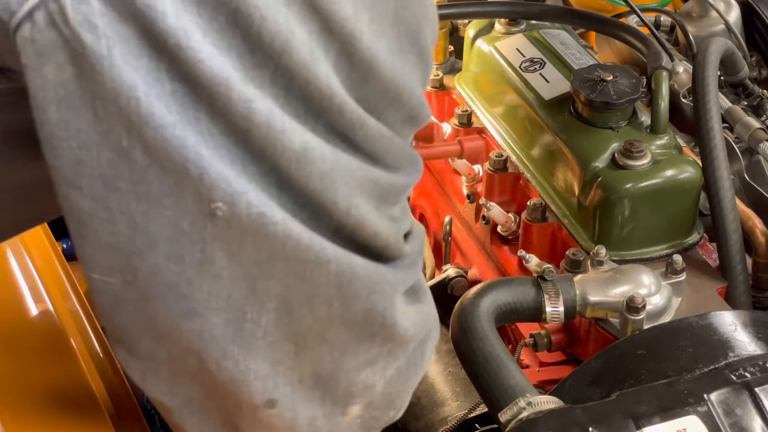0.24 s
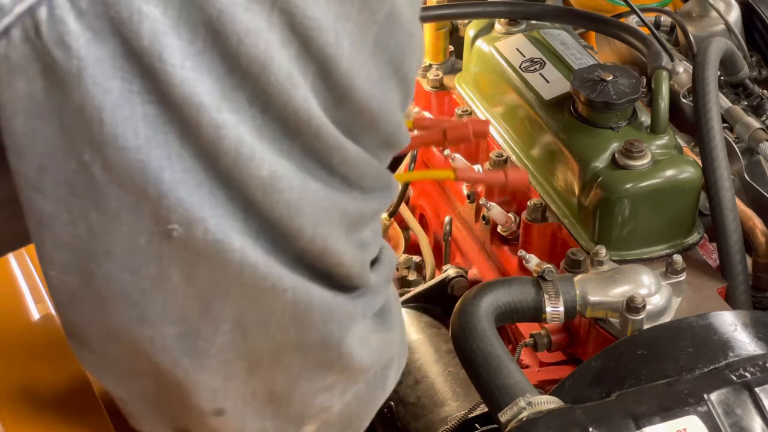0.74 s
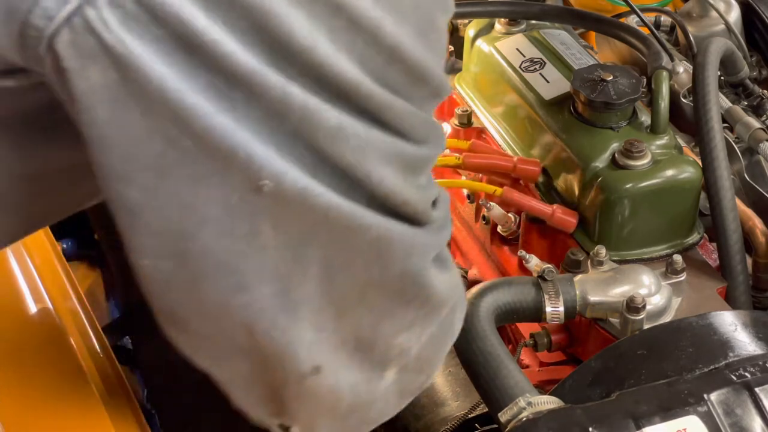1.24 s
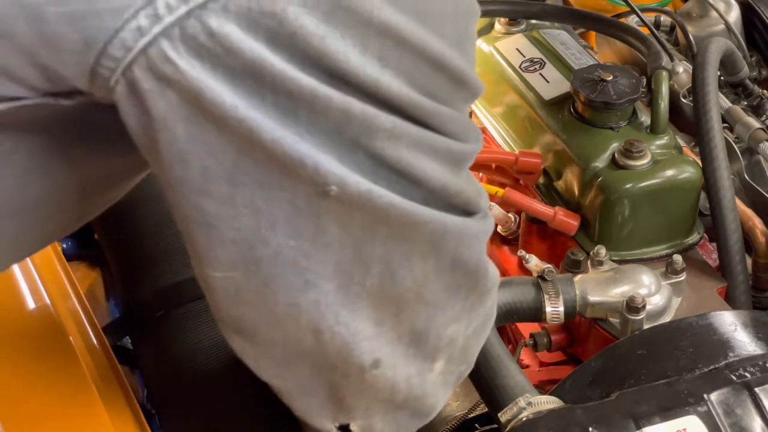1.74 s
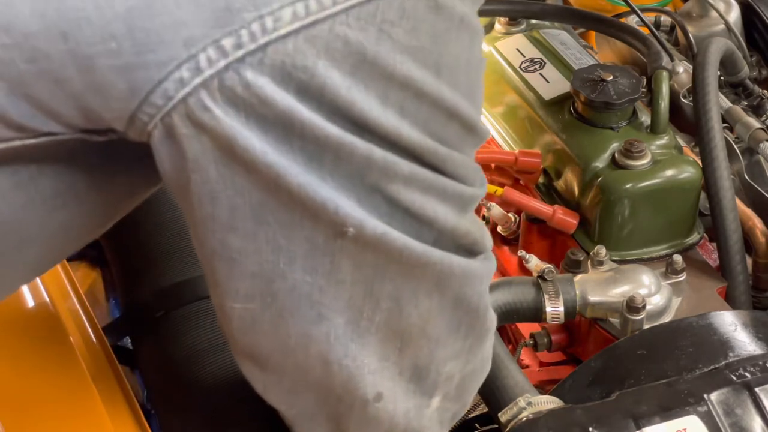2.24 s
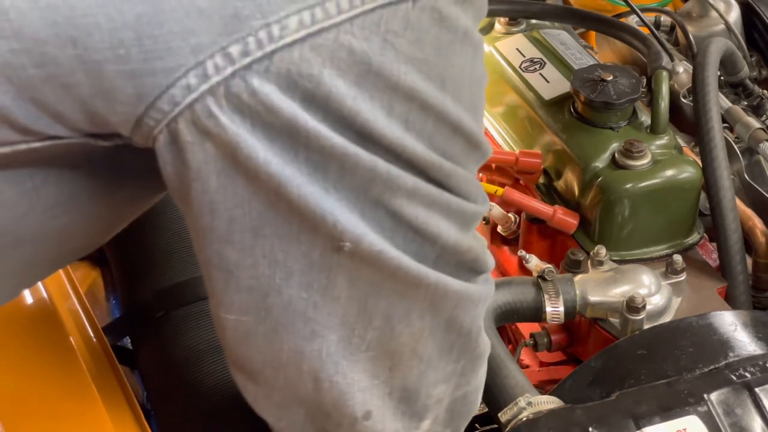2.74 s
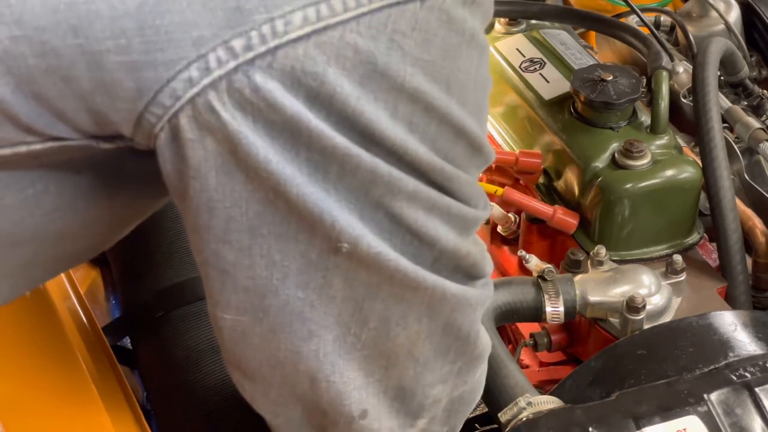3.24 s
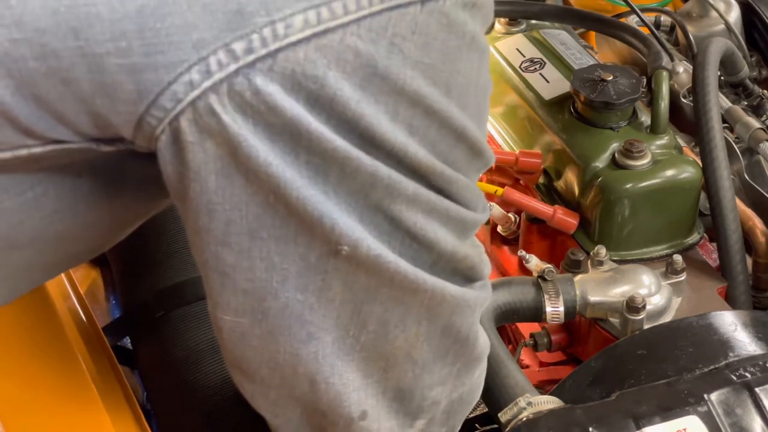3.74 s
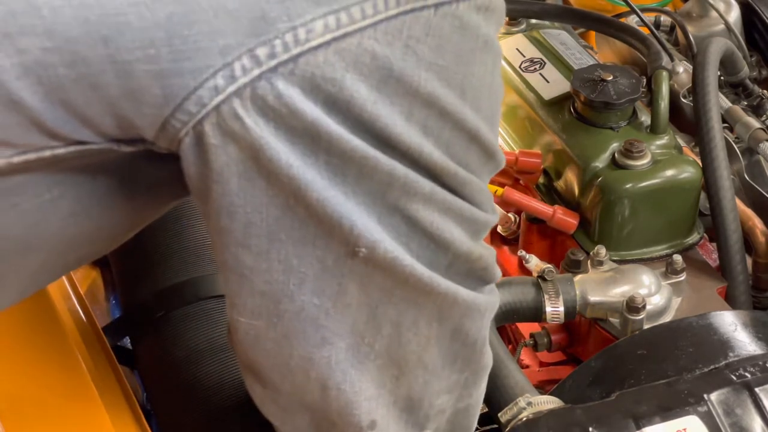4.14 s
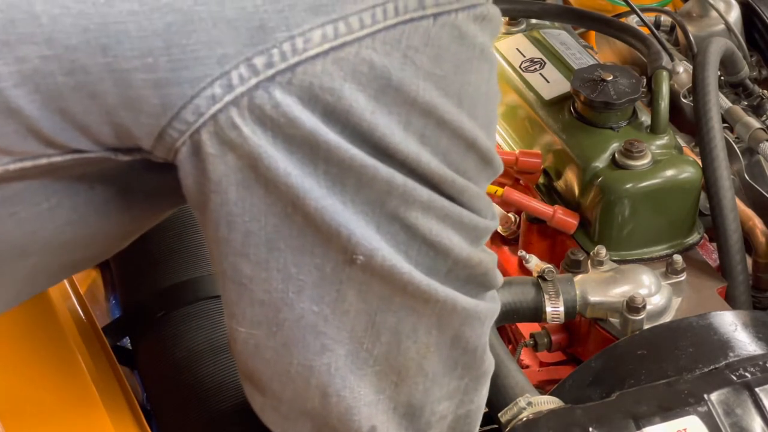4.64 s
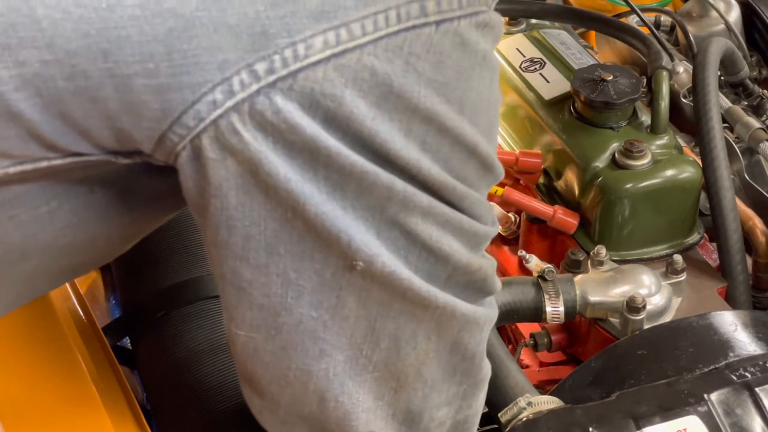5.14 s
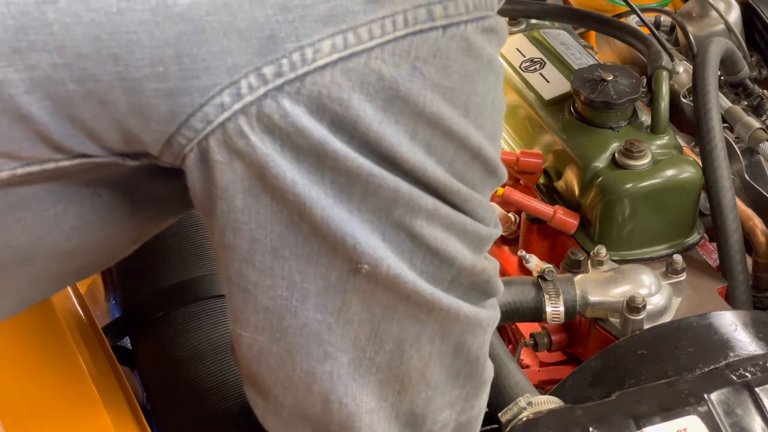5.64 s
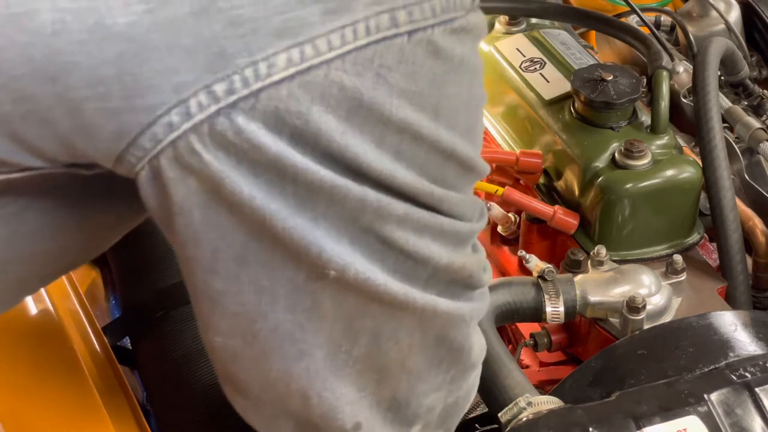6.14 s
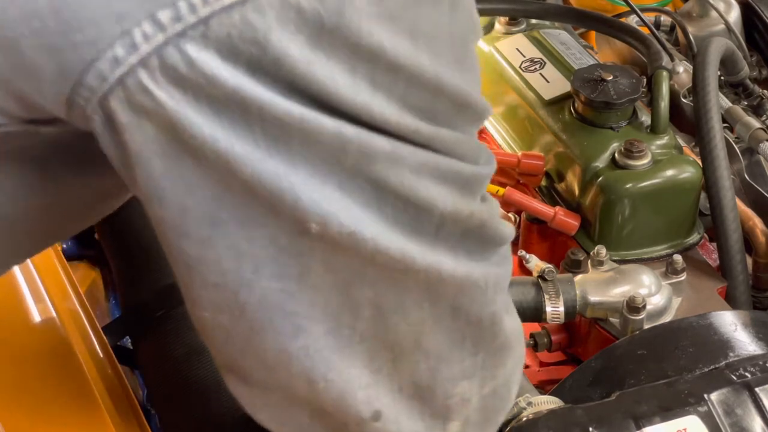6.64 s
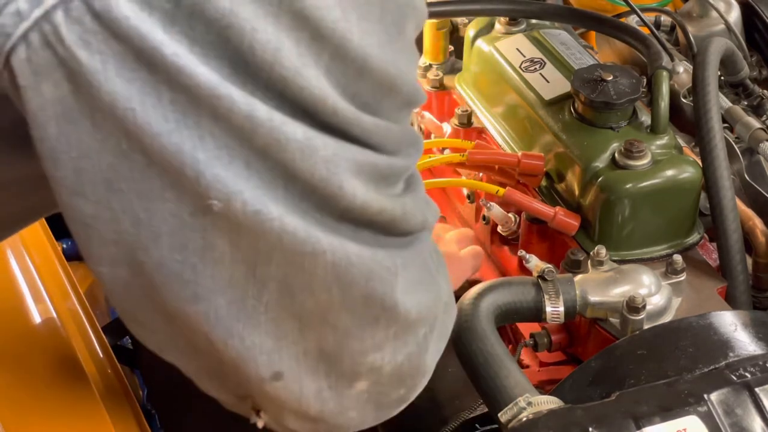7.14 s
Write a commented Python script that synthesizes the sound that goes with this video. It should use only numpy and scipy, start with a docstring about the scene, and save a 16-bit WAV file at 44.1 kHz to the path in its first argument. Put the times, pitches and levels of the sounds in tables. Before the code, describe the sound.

Hands work in an open engine bay, heard close up in a quiet garage with a faint low rumble. A sleeve rustles softly on and off, with small ticks from leads and faint, dull thumps like footsteps. A soft bump comes at about 1.5 seconds, then three quick knocks on a metal body panel between 2.2 and 2.4 seconds. At 3.7 seconds a rubber boot clicks sharply onto a spark plug, followed by two knocks around 4 seconds. At 5.5 seconds another clip snaps home with a bright, hollow crack, by far the loudest sound, ringing briefly off the walls. Around 6 seconds a hard boot end clacks on the engine cover, and a cluster of dull bumps and rubbing follows near 6.5 seconds. A last sharp snap with a thin metallic ring comes at about 7.3 seconds.

```python
"""Fitting spark plug boots in a garage

Close to an open engine bay, on a stereo microphone whose two ports shift the treble in phase.
Hands push rubber boots onto the plugs: metal clips snap home, cracking through the hollow boots,
and the garage walls ring after each snap. Leads and knuckles knock on the bodywork, small parts tick,
and a sleeve and hands rustle over low, dull thumps like footsteps."""
import sys
import numpy as np
from scipy import signal
from scipy.fft import rfft, irfft
from scipy.io import wavfile
from scipy.ndimage import uniform_filter1d

SR = 44100
rng = np.random.default_rng(int(sys.argv[2]) if len(sys.argv) > 2 else 0)


def persist_wave(psi):
    """Save psi, clipped to +-1, as 16-bit WAV."""
    counts = np.round(np.clip(psi, -1, 1) * 32767).astype(np.int16)
    wavfile.write(sys.argv[1], SR, np.atleast_2d(counts).T)


N = 326781

# A clip jumps over its terminal in several jolts: (time [s], peak [dB], tilt [dB/octave],
# rattle length [ms], ring over crack [dB], air column in the boot [Hz])
CLIP_JOLTS = [(3.658, -43.5, 0, 38, -8, 1024), (3.6739, -26.5, 4, 3.4, -16, 1030),
              (3.6760, -22, 2.5, 3.2, -9, 1030), (3.6790, -27.5, 4, 9, -11, 1015),
              (5.4883, -5, -1.5, 0.84, -5, 1480), (5.4890, -4.5, 7, 3.3, -32, 1480),
              (5.4899, 1, 3, 3, 1, 1480), (5.4929, -1, 2, 2.6, 2, 1480), (5.498, -18.5, 0, 3.7, 3, 1480),
              (5.5073, -24, 8, 3.4, 4.5, 1480), (7.2762, -30, -1, 3, -9, 2400),
              (7.2777, -19, 5, 9, -1, 2360), (7.2843, -29, 5, 4.9, -3, 2424),
              (7.293, -34, 6, 58, -24, 2370), (7.313, -34, 1, 27, -16, 2000)]
# Modes of plug, clip and boot, damped by the rubber: (frequency [Hz], level [dB], t60 [ms])
PLUG_MODES = [(475, -12, 13), (560, -3, 20), (730, -5, 20), (1540, -5.5, 18), (1640, -12, 60),
              (2860, -8.5, 11), (3160, -7.5, 14), (3850, -3.5, 19), (4320, 1, 19), (4500, -1.5, 12),
              (5560, -7, 17), (6300, -5.5, 10), (7300, -8, 7), (11240, -12.5, 4.8), (13170, -14, 4.7)]
# Spectrum of the crack: (frequency [Hz], level [dB])
CRACK_SPECTRUM = [(250, -24), (420, -12.5), (800, 0), (1650, 0.5), (2300, -4.5), (3000, -2.5), (4600, 4),
                  (7000, -3), (9500, -4), (11500, -3.5), (14000, -17.5), (16500, -23.5)]


def clip_snaps():
    """Each jolt is a short rattle that cracks and rings plug and clip; no bass leaves parts so small."""
    out = np.zeros(N)
    modes = [(hz, db, t60_ms / 1000) for hz, db, t60_ms in PLUG_MODES]
    for start, db, tilt_db, rattle_ms, ring_db, boot_hz in CLIP_JOLTS:
        blow = burst([(250, -4 * tilt_db), (16000, 2 * tilt_db)], rattle_ms / 8)
        crack = burst(tilted(CRACK_SPECTRUM, tilt_db, pivot_hz=4000), rattle_ms / 2, rise_ms=0.25)
        plug = undb(ring_db) * unit(ring(blow, modes))
        add(out, start, plug + unit(hollow_boot(crack, boot_hz)), db)
    return highpass(out, order=4, hz=350)


def hollow_boot(crack, boot_hz, returned=0.47):
    """The crack runs to and fro in the boot's air column, duller on each round."""
    loop = np.zeros(round(SR / boot_hz) + 3)
    loop[0] = 1
    loop[-5:] = -returned * np.array([1, 2, 3, 2, 1]) / 9
    return signal.lfilter([1], loop, crack)


# Metal set ringing by a snap: (time [s], peak [dB], touched after [s],
# modes as (frequency [Hz], level [dB], t60 [s]))
METAL_RINGS = [(3.6745, -31, .066, [(2130, -2, .05), (3120, -3, .05), (4110, 0, .09), (4900, 1, .04),
               (6270, -5, .04), (11800, -10, .03), (13500, -8, .06)]),
               (7.279, -25, 0.044, [(4600, -5, 0.14), (4760, -14, 0.094), (5432, -4, .18), (6400, -10, .06),
               (7300, -4, 0.15), (9700, -8, 0.06), (12364, -2, 0.17), (13493, -4, 0.35)])]


def metal_rings():
    """Thin, high modes ring on after a snap and drop 14 dB when the piece is touched."""
    out, t = np.zeros(N), np.arange(8192) / SR
    impulse = 1. * (t == 0)
    for start, db, touched, modes in METAL_RINGS:
        damping = undb(-14 * np.clip((t - touched) / .006, 0, 1))
        add(out, start, ring(impulse, modes) * damping, db)
    return out


# Clicks the snaps send round the garage: (time [s], peak [dB], spectrum as (frequency [Hz], level [dB]))
WALL_CLICKS = [(3.678, -10.5, [(300, -25), (500, -12), (1000, -20), (1700, -9.5), (2130, -11), (2600, -10),
               (3100, -5.5), (3600, -11), (4150, -3), (4500, -12), (4880, -4.5), (5500, -13), (6500, -10.5),
               (8500, -8.5), (11000, -19.5), (13500, -19.5), (16000, -35)]), (5.4902, 11.5, [(250, -28),
               (350, -18), (520, -5), (760, -11), (1000, -15), (1480, -9), (1640, 0), (1800, -12.5),
               (2250, -21.5), (3030, -5.5), (3500, -16.5), (4300, -0.5), (4850, -10), (5400, -6.5),
               (5800, -7.5), (7200, -10.5), (9000, -17.5), (11200, -17), (14000, -21), (16000, -31)]),
               (7.281, -2, [(300, -12), (1000, -13.5), (2000, -5.5), (3200, -10), (4700, -2), (6200, -10),
               (8000, 2.5), (11000, -10), (13500, -18), (16000, -28)])]


def snaps_to_walls(size=1024):
    """The jolts of a snap blend into one resonant click that reaches the microphone only as echo."""
    out = np.zeros(N)
    impulse = signal.unit_impulse(size, "mid")
    for centre, db, spectrum in WALL_CLICKS:
        add(out, centre - size / 2 / SR, colour(impulse, spectrum) * np.hanning(size), db)
    return out


# Blows near the microphone: (time [s], ring peak [dB], push [ms], scuff over ring [dB],
# scuff decay [ms], scuff tilt [dB/octave])
PANEL_KNOCKS = [(0.98, -61.5, 1.3, 11.5, 9.1, 1), (2.224, -33.5, 0.76, 1, 5.5, -4.5),
                (2.307, -30.5, 0.74, -11, 10.5, -5), (2.405, -29.5, 0.57, -4, 6, -6),
                (2.622, -48, 0.7, 2.5, 21, -7), (2.861, -47, 1.1, 2.5, 53, 2.5),
                (3.995, -29.5, 0.6, -4.5, 16, -6), (4.073, -31.5, 0.82, -4.5, 21, -4.5),
                (6.045, -40, 0.83, -2, 38, 2), (7.313, -46.5, 0.98, 3.5, 38, -12),
                (7.349, -49.5, 2.6, -9, 12, 7)]  # leads and knuckles on a body panel
WING_BUMPS = [(0.185, -40, 2.56, -5, 24, 0.5), (1.438, -47, 1.1, 0, 17, -7.5),
              (1.456, -38, 1.9, -2, 9.8, -13), (1.485, -35, 1.7, 1.5, 9.4, -11.5),
              (6.424, -39, 2.34, -4, 16, -4), (6.436, -39.5, 2.3, 1, 12, 0),
              (6.452, -40.5, 2.6, -9.5, 15, -4), (6.501, -41.5, 2.3, 6, 11, -8),
              (6.53, -39, 3.5, -16, 16.4, -12), (6.581, -39, 1.64, 1, 12, -5.5),
              (6.594, -33, 1.5, -14, 13, -17), (6.742, -43.5, 5.5, -33, 15, -22),
              (6.955, -56.5, 2.1, -8, 11, 1)]  # hand and leads, heavier, on the inner wing
COVER_CLACKS = [(5.978, -24.5, .35, -3.5, 10.5, 1.3), (6.114, -33, 0.26, -0.5, 13, 4.4),
                (6.128, -41, 0.25, -6, 7.2, 2.7), (6.14, -39, 0.19, -5, 7.2, 2)]  # a hard boot end on a cover
# Modes of the three struck sheets: (frequency [Hz], level [dB], t60 [s])
PANEL_MODES = [(136, -5, 0.24), (120, -8, .25), (165, -9, 0.2), (194, -10, 0.2), (231.6, -10, 0.12),
               (327.6, -6, 0.15), (387.4, -0.5, 0.08), (524, -3, 0.061), (672, -11, 0.054),
               (712, -5.5, 0.065), (882, -7.5, 0.083), (1250, -8.5, 0.032), (1480, 2, 0.012),
               (1866, -2.5, 0.0081)]
WING_MODES = [(144.2, -1.5, 0.12), (257, 1.5, 0.11), (328, -7.5, 0.24), (407.4, -7, 0.19),
              (523.5, 4, 0.055), (615, -6.5, 0.095), (815, -9, 0.051), (1000, -10, 0.044)]
COVER_MODES = [(285, -4, 0.2), (450, -11.5, 0.19), (586, -9, 0.13), (838, -4.5, 0.093), (1176, -1, 0.086),
               (1352, -7.5, 0.077), (1576, -5, 0.062), (1920, -10, 0.046), (2350, -13, 0.13),
               (2590, -10, 0.052), (2850, -13, 0.054), (3210, -11, 0.076), (3390, -12, .07)]


def bodywork():
    """Panel, inner wing and cover each answer a blow with their own modes."""
    panel = knocks(PANEL_KNOCKS, PANEL_MODES)
    wing = knocks(WING_BUMPS, WING_MODES)
    cover = knocks(COVER_CLACKS, COVER_MODES)
    return highpass(panel + wing + cover, order=3, hz=105)


# A lead scuffing the sheet: (frequency [Hz], level [dB])
SCUFF_SPECTRUM = [(150, -11), (500, 6.5), (1200, -3), (1900, -6), (2500, -16), (5000, -36), (9000, -32),
                  (15000, -40)]


def knocks(blows, modes, late_cycles=1.319, slap_db=-7):
    """A push slaps and rings a sheet, a softer one fewer of its modes; the lead scuffs after it."""
    out = np.zeros(N)
    for start, db, push_ms, scuff_db, scuff_ms, tilt_db in blows:
        contact = np.hanning(max(int(push_ms * SR / 1000), 3) + 2)
        push = np.pad(contact, (0, 16384 - len(contact)))
        push = push + 0.38 * np.roll(push, int(0.00855 * SR))  # the lead bounces once
        spot_db = 1.5 * rng.standard_normal(len(modes))  # each spot wakes the modes differently
        sheet = 0
        for (hz, mode_db, t60), offset_db in zip(modes, spot_db):
            late_push = np.roll(push, int(late_cycles * SR / hz))  # low bending waves travel slowly
            sheet += ring(late_push, [(hz, mode_db + offset_db, t60)])
        slap = np.diff(np.convolve(contact, contact), prepend=0)
        scuff = burst(tilted(SCUFF_SPECTRUM, tilt_db, pivot_hz=800), scuff_ms, rise_ms=0.8)
        add(out, start, sheet, db)
        add(out, start, slap, db + slap_db)
        add(out, start, scuff, db + scuff_db)
    return out


# Boots and leads ticking: (time [s], peak [dB], centre [Hz], width [Hz], length [ms])
LEAD_TICKS = [(0.161, -55, 1640, 2490, 16), (0.635, -60, 3850, 1926, 20), (0.701, -65, 3860, 2000, 30),
              (0.948, -56, 2140, 1976, 14), (0.981, -66, 2000, 3000, 16), (1.661, -48.5, 1530, 2450, 15),
              (2.584, -65, 1470, 2560, 30), (2.706, -52, 1800, 2210, 24), (3.479, -69, 3840, 3020, 28),
              (4.095, -52, 4500, 8900, 11), (4.181, -61, 2650, 1370, 29), (4.531, -76, 3000, 3000, 11),
              (4.77, -63, 2500, 6000, 11), (4.81, -71.5, 3020, 3030, 12), (4.905, -72, 2790, 2520, 9.1),
              (5.002, -65, 1390, 1600, 14), (5.362, -71, 3000, 5000, 40), (5.272, -55, 1613, 2285, 24),
              (5.977, -28.5, 2500, 5870, 7.9), (6.109, -37, 2990, 8080, 22), (6.433, -49.5, 2500, 5960, 20),
              (6.16, -43.5, 1500, 2480, 25), (6.578, -48.5, 2503, 5010, 15), (6.367, -62, 1515, 3970, 28),
              (6.968, -68, 1375, 2496, 17)]


def lead_ticks():
    """Each light contact is a short noise around one resonance with broad skirts."""
    out, grid_hz = np.zeros(N), np.geomspace(200, 16000, num=60)
    for start, db, centre_hz, width_hz, length_ms in LEAD_TICKS:
        resonance = [(hz, -15 * np.log10(1 + (2 * (hz - centre_hz) / width_hz) ** 2)) for hz in grid_hz]
        add(out, start, burst(resonance, length_ms / 2), db)
    return out


# Small hollow or metal parts touched once: (time [s], peak [dB], frequency [Hz], t60 [s])
PART_TINKS = [(0.636, -55, 3520, 0.1), (0.702, -59, 3420, 0.14), (0.981, -47.5, 986, 0.093),
              (2.867, -45.5, 860, 0.085), (2.877, -43.5, 1394, 0.14), (4.181, -59, 2568, 0.086),
              (4.183, -66.5, 3330, 0.072)]


def part_tinks():
    """Three close modes, struck by a tap of about 1 ms, beat roughly as they fade."""
    out, t = np.zeros(N), np.arange(16384) / SR
    tap = np.pad(np.hanning(40), (0, len(t) - 40))
    for start, db, hz, t60 in PART_TINKS:
        cluster = [(hz, 0, t60), (hz * 1.02, -6, t60 * .6), (hz * .975, -8, t60 * .6)]
        add(out, start, ring(tap * np.cos(2 * np.pi * hz * t), cluster), db)
    return out


# Low, dull thumps like footsteps: (time [s], peak [dB], frequency [Hz], t60 [s])
LOW_THUMPS = [(0.261, -43, 58.6, 0.2), (0.812, -43, 62.7, 0.51), (1.341, -48.5, 56, 0.57),
              (1.9, -57, 52, 0.88), (2.446, -48, 65.8, 0.33), (3.904, -57, 70, 0.22), (4.119, -53, 52.7, 1),
              (4.642, -51, 55.4, 0.43), (5.759, -52.5, 62.4, 0.34), (6.096, -45.5, 74.4, 0.35),
              (6.347, -53, 68, 0.43), (6.549, -53, 57.9, 0.51), (6.74, -52, 60, 0.51)]


def low_thumps(push_hz=55):
    """A soft push rings one low mode that builds for a cycle or two and dies."""
    out, push = np.zeros(N), np.zeros(SR // 2)
    push[:1300] = np.hanning(1300) * np.sin(2 * np.pi * push_hz * np.arange(1300) / SR)
    for start, db, hz, t60 in LOW_THUMPS:
        add(out, start, ring(push, [(hz, 0, t60)]), db)
    return out


# Drags of the sleeve that sound its hollow body: (time [s], length [s], level [dB])
SLEEVE_DRAGS = [(1.1, .29, -67), (1.72, .3, -66), (2.08, .1, -68), (2.95, .2, -72)]
# The two resonances of the hollow sleeve: (frequency [Hz], level [dB])
DRAG_SPECTRUM = [(450, -25), (620, -3), (760, -10), (1000, 0), (1150, -6), (1300, -20), (2000, -30)]


def sleeve_drags(ramp_s=.05):
    """A dragging sleeve wakes its hollow body with uneven friction."""
    t, gain = np.arange(N) / SR, 0
    for start, length, db in SLEEVE_DRAGS:
        gain += undb(db) * np.clip(np.minimum(t - start, start + length - t) / ramp_s, 0, 1)
    return gain * noise(DRAG_SPECTRUM, flicker_db=3, rate_hz=40)


# Strokes of sleeve and hands: (time [s], rise [s], hold [s], base fall [s], rustle [dB], rubbing [dB])
HAND_STROKES = [(0.0, 0.0064, 0.013, 0.12, -71.5, -63.5), (0.154, 0.0059, 0.007, 0.12, -62.5, -67),
                (0.38, 0.068, 0.1, 0.094, -65, -66), (0.667, 0.1, 0.089, 0.16, -66.5, -70),
                (0.933, 0.0093, 0.0079, 0.035, -77, -63), (1.05, 0.12, 0.16, 0.1, -59, -63),
                (1.272, 0.033, 0.31, 0.049, -78, -62.5), (1.644, 0.016, 0.064, 0.21, -68, -59),
                (1.677, 0.089, 0.21, 0.46, -58, -59.5), (2.004, 0.14, 0.04, 0.12, -62.5, -65),
                (2.215, 0.029, 0.06, 0.056, -74, -51), (2.396, 0.011, 0.0055, 0.052, -72, -46.5),
                (2.569, 0.015, 0.017, 0.21, -70.5, -68), (2.692, 0.02, 0.09, 0.058, -66.5, -57.5),
                (2.746, 0.097, 0.089, 0.23, -63, -61.5), (2.939, 0.045, 0.29, 0.21, -68, -73.5),
                (3.465, 0.024, .01, .05, -97, -85), (3.895, 0.093, 0.077, .05, -76.5, -78),
                (4.06, 0.014, 0.022, 0.14, -70.5, -53), (4.762, 0.0077, 0.0072, 0.041, -72.5, -93),
                (5.269, 0.0085, 0.016, 0.3, -91, -69), (5.785, 0.089, 0.16, 0.045, -67, -75.5),
                (5.965, 0.045, 0.099, 0.16, -57.5, -50), (6.326, 0.022, 0.039, 0.18, -71.5, -81),
                (6.416, 0.016, 0.023, 0.13, -59.5, -49.5), (6.447, 0.043, 0.094, 0.056, -55, -59),
                (6.547, 0.03, 0.071, 0.18, -68.5, -55), (6.671, 0.053, 0.13, 0.19, -76, -83.5),
                (6.92, 0.061, 0.032, 0.17, -79, -72.5)]
# Bright rustle and dull rubbing: (frequency [Hz], level [dB])
RUSTLE_SPECTRUM = [(300, -12), (600, 2), (800, -2), (1020, -1.5), (1350, -3.5), (1850, -3.5), (2400, -7.5),
                   (2950, -7.5), (3600, -12.5), (5200, -11), (9000, -15.5), (12500, -17), (14000, -19),
                   (15800, -34)]
RUBBING_SPECTRUM = [(80, -30), (140, 3), (300, -1), (600, -7.5), (1000, -19.5), (2000, -47.5)]


def sleeve_and_hands():
    """Friction noise follows the strokes; the rubbing lingers longer than the rustle."""
    *_, rustle_db, rubbing_db = np.transpose(HAND_STROKES)
    rustle = noise(RUSTLE_SPECTRUM, flicker_db=1.5, rate_hz=25)
    rubbing = noise(RUBBING_SPECTRUM, flicker_db=0.63, rate_hz=22)
    return (rustle * stroke_gain(rustle_db, idle_db=-91, fall_stretch=0.91)
            + rubbing * stroke_gain(rubbing_db, idle_db=-80.5, fall_stretch=1.6))


def stroke_gain(levels_db, idle_db, fall_stretch, depth_db=25):
    """Each stroke swells, holds and fades; overlapping strokes add in power."""
    t, power = np.arange(0, N + 64, 64) / SR, undb(idle_db) ** 2
    for (start, rise, hold, fall, *_), db in zip(HAND_STROKES, levels_db):
        before = np.maximum(start + rise - t, 0) / rise
        after = np.maximum(t - start - rise - hold, 0) / (fall * fall_stretch)
        power += undb(db - depth_db * (before + after)) ** 2
    return np.interp(np.arange(N) / SR, t, np.sqrt(power))


# Decay of the garage: (frequency [Hz], t60 [s])
GARAGE_DECAY = [(125, 1), (500, 0.52), (1600, 0.59), (3000, 0.6), (5000, 0.54), (7500, 0.42), (9500, 0.68),
                (11500, 0.37), (14000, 0.26), (16000, 0.37)]


def garage_echo(x, level_db=-5, bay_db=11.5, bay_ms=16, size=40000):
    """The walls return two unrelated tails, longest in the bass; the engine bay adds early echoes."""
    t, hz = np.arange(size) / SR, np.fft.rfftfreq(size, 1 / SR)
    white = rfft(rng.standard_normal((2, size)))
    decay_hz, decay_s = np.transpose(GARAGE_DECAY)
    tails = 0
    for centre in 80 * 2 ** (np.arange(25) / 3):  # third-octave bands
        band = np.clip(1 - 3 * np.abs(np.log2((hz + 1) / centre)), 0, 1)
        t60 = np.interp(np.log(centre), np.log(decay_hz), decay_s)
        tails += irfft(white * band, size) * undb(-60 * t / t60)
    tails *= 1 + undb(bay_db) * np.exp(-t * 1000 / bay_ms)
    tails *= np.clip(t / 0.0045, 0, 1)
    tails /= np.sqrt(np.sum(tails ** 2) / 2)
    return undb(level_db) * signal.fftconvolve(x[None], tails, axes=1)[:, :N]


# Low rumble and faint air of the garage: (frequency [Hz], level [dB])
RUMBLE_SPECTRUM = [(22, -45), (38, -2), (53, 12), (70, 12), (100, 5), (160, -49.5)]
AIR_SPECTRUM = [(30, -9.5), (80, 3), (200, -14), (450, -25), (900, -31), (2000, -34.5), (5000, -43),
                (9000, -40.5), (12500, -40.5), (14000, -51.5), (16000, -59.5)]


def room_tone():
    """Rumble and air lie behind the work, wavering slightly in level."""
    rumble = undb(-68.5) * noise(RUMBLE_SPECTRUM, flicker_db=0.39, rate_hz=1.7)
    air = undb(-69) * noise(AIR_SPECTRUM, flicker_db=1.4, rate_hz=12)
    return rumble + air


def undb(db):
    """Gain of a level in dB."""
    return 10 ** (np.asarray(db) / 20)


def unit(x):
    """Scale to rms 1."""
    return x / np.sqrt(np.mean(x ** 2))


def highpass(x, order, hz):
    """Roll off the bass below hz."""
    return signal.sosfilt(signal.butter(order, hz, "high", fs=SR, output="sos"), x)


def tilted(spectrum, db_per_octave, pivot_hz):
    """Tilt a spectrum about a pivot."""
    return [(hz, db + db_per_octave * np.log2(hz / pivot_hz)) for hz, db in spectrum]


def colour(x, spectrum):
    """Filter x by a spectrum of (frequency [Hz], level [dB]) points."""
    hz = np.fft.rfftfreq(x.shape[-1], 1 / SR)
    point_hz, point_db = np.transpose(spectrum)
    gain = undb(np.interp(np.log(hz + 1), np.log(point_hz), point_db))
    return irfft(rfft(x) * gain, x.shape[-1])


def noise(spectrum, flicker_db, rate_hz):
    """Coloured noise whose level flickers at random."""
    hold = int(SR / rate_hz)
    steps = np.repeat(rng.standard_normal(N // hold + 1), hold)
    flicker = undb(flicker_db * uniform_filter1d(steps, hold)[:N])
    return unit(colour(rng.standard_normal(N), spectrum) * flicker)


def ring(x, modes):
    """Sum of decaying modes excited by x."""
    out = np.zeros(len(x))
    for hz, db, t60 in modes:
        pole = np.exp(2j * np.pi * hz / SR - np.log(1000) / (t60 * SR))
        out += undb(db) * signal.lfilter([1], [1, -pole], x).imag
    return out


def burst(spectrum, decay_ms, rise_ms=0.06, size=8192):
    """Noise that rises quickly and fades, evened out to the given spectrum."""
    t_ms = np.arange(size) * 1000 / SR
    half_fade = np.exp(-t_ms / (2 * decay_ms))  # applied before and after colouring
    bins = rfft(rng.standard_normal(size) * half_fade)
    even = irfft(bins / uniform_filter1d(np.abs(bins), size=24), size)
    return unit(colour(even, spectrum) * half_fade * np.clip(t_ms / rise_ms, 0, 1))


def add(track, start, x, peak_db):
    """Mix x in at start [s] with the given peak."""
    i = int(start * SR)
    x = x[:N - i]
    track[i:i + len(x)] += x * undb(peak_db) / np.abs(x).max()


# Stereo width of echo, rustle and room tone in each band: (frequency [Hz], side level [dB])
STEREO_WIDTH = [(60, -17), (250, -13), (600, -6.5), (1100, -5), (1600, -24), (2400, -33.5), (3000, -15),
                (7900, -6), (8400, -23), (9300, -11), (10000, -3), (12300, -15), (13000, -38)]


def scene():
    """Hits sit in the middle; echo, rustle and room tone spread left and right in some bands."""
    sheets = bodywork()
    small_parts = lead_ticks() + part_tinks() + sleeve_drags()
    rings = metal_rings()
    # Knocks close to the microphone and thin high rings raise less echo.
    to_walls = undb(-1) * sheets + small_parts + undb(-10.5) * rings + snaps_to_walls()
    mid, side = garage_echo(to_walls) + [sleeve_and_hands() + room_tone() for _ in range(2)]
    mid += sheets + small_parts + rings + clip_snaps() + low_thumps()
    side = colour(side, STEREO_WIDTH)
    return np.array([mid + side, mid - side])


# Phase between the microphone ports: (frequency [Hz], lead of left over right [rad])
PORT_PHASE = [(0, 0), (2500, 0), (3000, .5), (5250, .5), (5770, -1.55), (6700, -.75), (7240, -1.3),
              (7580, -2.4), (7950, -2.6), (8250, -np.pi), (9500, -np.pi), (12100, -5.4),
              (12800, -2 * np.pi)]


def record(dry, top_hz=16400):
    """The ports turn left and right against each other in phase; peaks are rounded, the top is cut."""
    hz = np.fft.rfftfreq(N, 1 / SR)
    phase = uniform_filter1d(np.interp(hz, *np.transpose(PORT_PHASE)), size=2500)
    turn = np.exp(.5j * phase * np.array([[1], [-1]]))
    rounded = np.tanh(irfft(rfft(dry) * turn, N))
    return signal.sosfilt(signal.ellip(12, .2, 100, top_hz, fs=SR, output="sos"), rounded)


dry = scene()
out = record(dry)
persist_wave(out)
```